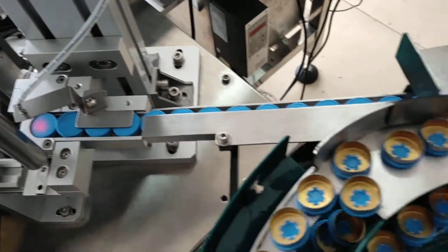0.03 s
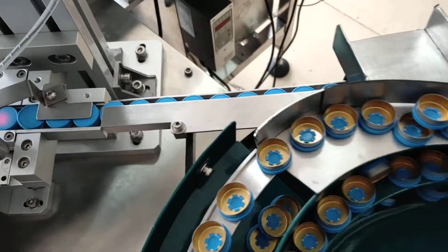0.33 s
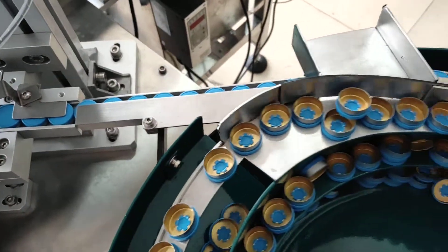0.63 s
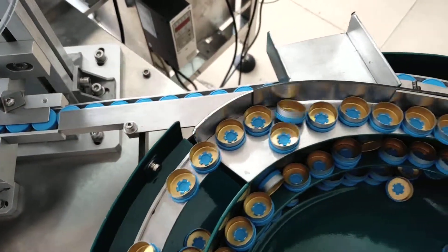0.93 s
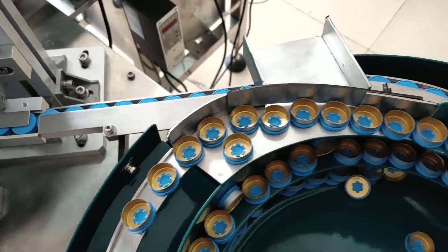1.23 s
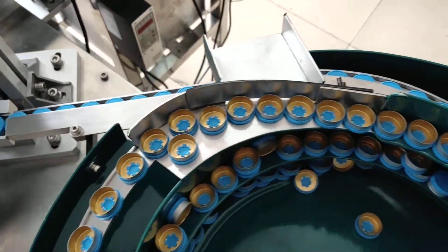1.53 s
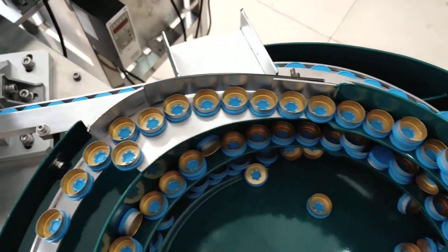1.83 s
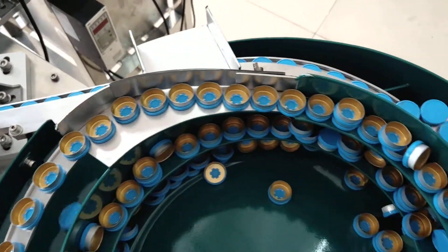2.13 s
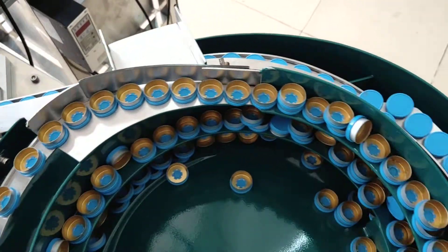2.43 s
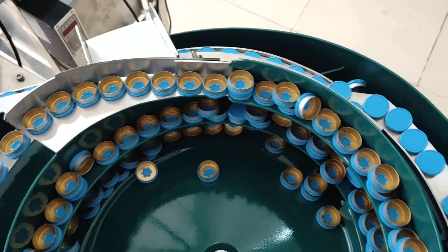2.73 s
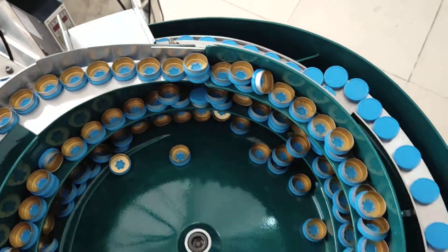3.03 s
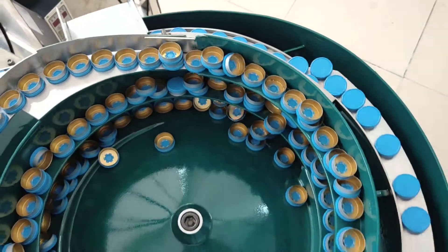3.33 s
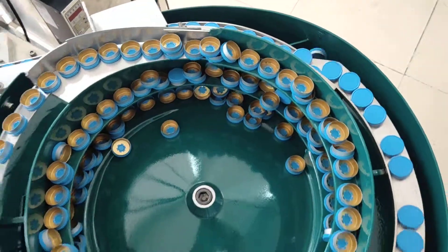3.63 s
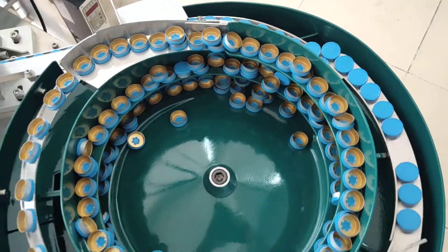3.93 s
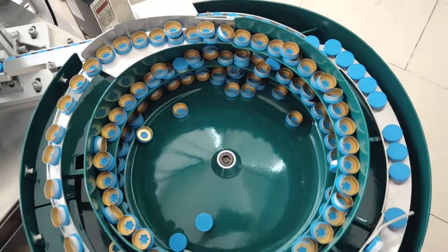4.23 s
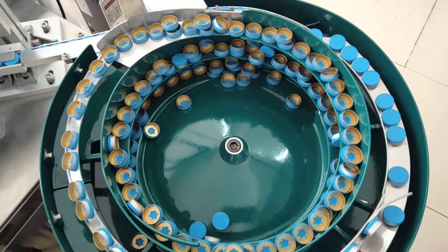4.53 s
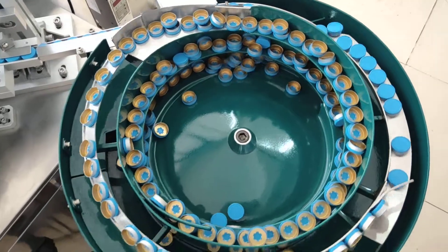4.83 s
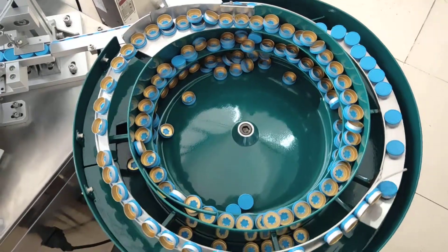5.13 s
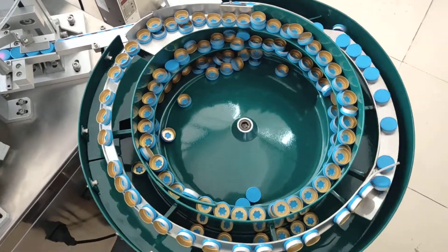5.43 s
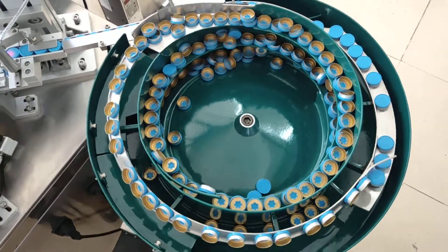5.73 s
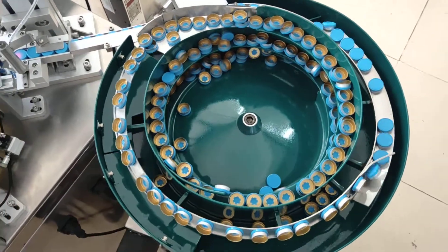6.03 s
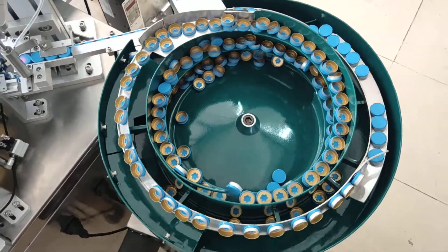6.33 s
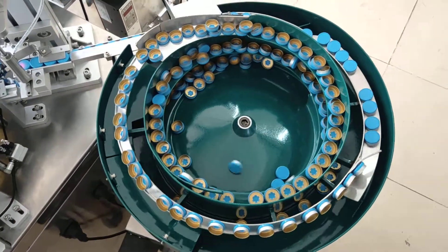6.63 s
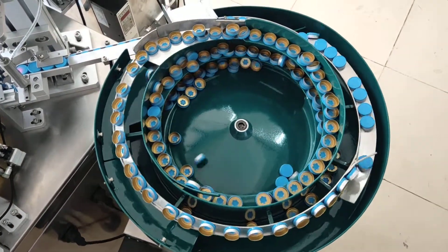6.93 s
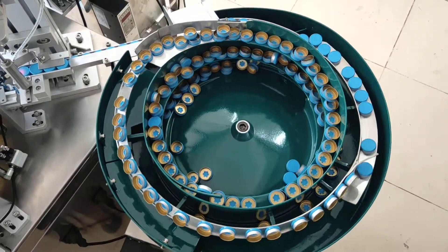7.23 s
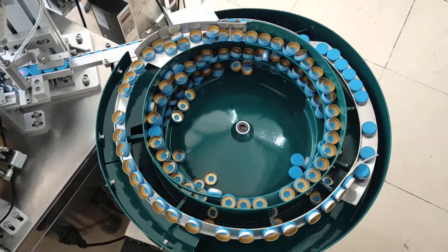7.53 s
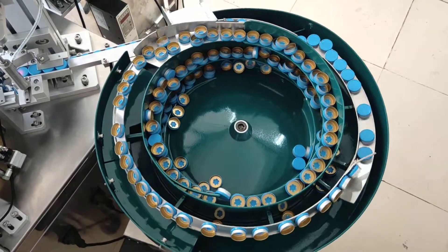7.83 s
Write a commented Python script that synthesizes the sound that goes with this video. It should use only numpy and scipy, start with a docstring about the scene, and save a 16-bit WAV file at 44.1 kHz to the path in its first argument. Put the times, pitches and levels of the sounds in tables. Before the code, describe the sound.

Hundreds of small caps rattle in a vibrating steel bowl, with a low hum, a wavering metallic tone and scattered clicks.

```python
"""A vibratory bowl feeder shakes hundreds of small caps up its spiral track in a factory hall.
From the start the drive magnet hums over the hall's rumble; once a cycle the bowl tosses the caps, whose
impacts merge into a buzzing rattle and excite the steel's resonances. A panel sings in spurts, and now and
then a tumbling cap clicks. After three seconds the microphone, at first near the rim, draws back faster.
From six seconds on, a few caps drop onto the ringing bowl floor or clatter on the heap."""
import sys
import numpy as np
from scipy import signal
from scipy.fft import rfft, irfft, next_fast_len
from scipy.io import wavfile

SR = 44100
rng = np.random.default_rng(int(sys.argv[2]) if len(sys.argv) > 2 else 0)


def output_pcm(signal):
    """Save a mono or channel-first signal as 16-bit PCM at the path in sys.argv[1].

    Samples are clipped to [-1, 1] before scaling.
    """
    pcm = np.clip(np.atleast_2d(signal).T, -1, 1) * 32767
    wavfile.write(sys.argv[1], SR, np.round(pcm).astype(np.int16))


N = 352359
TIME = np.arange(N) / SR
DRIVE_HZ = 95.99


def amp(db):
    """The decibel law: amplitude grows tenfold every 20 dB."""
    return 10 ** (np.asarray(db) / 20)


def unit(x):
    """Normalisation to rms 1."""
    return x / np.sqrt(np.mean(x ** 2) + 1e-20)


def follow(points):
    """Linear interpolation of (time [s], value) points at every sample."""
    return np.interp(TIME, *np.transpose(points))


def wander(rate_hz, size=800):
    """Random modulation: noise of rms about 1, low-passed near rate_hz."""
    f = np.fft.rfftfreq(size, N / SR / size)
    slow = irfft(rfft(rng.standard_normal(size)) * np.exp(-(f / rate_hz) ** 2))
    return np.interp(TIME, np.linspace(0, N / SR, size), unit(slow))


def colour(x, points):
    """Minimum-phase filtering by a (frequency [Hz], gain [dB]) curve."""
    hz, db = np.transpose(points)
    f = abs(np.fft.fftfreq(4096, 1 / SR))
    log_gain = np.log(amp(np.interp(np.log(f + 1), np.log(hz), db)))
    response = np.exp(np.conj(signal.hilbert(log_gain)))
    taps = np.fft.ifft(response).real[:len(f) // 2]
    return signal.oaconvolve(np.atleast_2d(x), taps[None], axes=1)[:, :N]


def add(mix, s, sound):
    """Superposition: a sound joins the mix at s seconds."""
    part = mix[:, round(s * SR):][:, :sound.shape[1]]
    part += sound[:, :part.shape[1]]


def heard(db, exponent, pass_s=0, pass_half_s=1, swell_db=0):
    """Spreading loss: gain goes as 1 / distance ** exponent, and swells as the microphone passes by."""
    # the microphone's path away from the rim: (time [s], distance [m])
    path = [(0, 0.27), (3.05, 0.38), (4.5, 0.7), (6.6, 1.18), (8, 1.1)]
    farther = follow(path) / path[0][1]
    swell = swell_db * np.exp(-((TIME - pass_s) / pass_half_s) ** 2)
    return amp(db + swell) / farther ** exponent


def tone(hz, waver):
    """Multipath interference: reflections make a tone waver differently at each microphone port."""
    paths = np.array([1 + waver * (wander(10) + 1j * wander(5)) for _ in range(2)])
    turns = hz * TIME + rng.random()
    return unit((paths * np.exp(2j * np.pi * turns)).real)


def drive():
    """Forced vibration: the magnet hums, and the steel responds at harmonics of the drive."""
    # the fourth harmonic comes and goes: (time [s], level [dB])
    fourth_level = [(0, -45), (.2, -38), (1.2, -47), (1.5, -37), (1.75, -51), (1.97, -38.5), (2.7, -43),
                    (3.3, -45.5), (3.56, -39.5), (4.05, -48.5), (4.35, -43), (5, -50), (5.5, -41.5),
                    (6, -51.5), (6.6, -42.5), (6.8, -49.5), (7, -43.5), (7.7, -44), (8, -46)]
    # weak overtones: (multiple of the drive, level at the rim [dB], distance exponent)
    overtones = [(2, -49, 0.027), (9, -52, 0.25), (11, -52, 0.34), (16, -48, 0.27), (18, -55, 0.23),
                 (19, -59, .35), (31, -49, 0.8), (33, -55, .1), (35, -50, 0.45), (74, -47, 0.0)]
    # panels that sing along: (multiple of the drive, base level [dB], distance exponent,
    # passing time [s], passing half-width [s], swell [dB])
    panel_tones = [(7, -56.5, 0.4, 0.37, 1.7, 8), (13, -59.5, 0.39, 6.4, 4.4, 19.5),
                   (14, -52, .0, 2.8, 1.9, 7.5), (34, -46, 0.93, 2.6, 0.34, 8.5)]
    hum = unit(np.cos(2 * np.pi * DRIVE_HZ * TIME)) * heard(-15.5, exponent=0.93)
    fourth = tone(4 * DRIVE_HZ, waver=0.16) * amp(follow(fourth_level))
    buzz = sum(heard(*level) * tone(k * DRIVE_HZ, waver=0.4) for k, *level in overtones)
    panels = sum(heard(*level) * tone(k * DRIVE_HZ, waver=0.19) for k, *level in panel_tones)
    return hum + fourth + buzz + panels


def hall():
    """Background noise: factory rumble, faint machine tones and a whine that stands out for a while."""
    # the whine's envelope: (time [s], level [dB])
    whine_level = [(0, -57), (2.1, -51), (2.28, -47), (3.4, -47), (5.1, -49.5), (5.35, -58), (8, -66)]
    # tones of other machines: (frequency [Hz], level [dB])
    machine_tones = [(140, -57), (183, -70), (265, -60), (296, -59), (450, -62.5), (796, -61)]
    # the rumble's spectrum: (frequency [Hz], relative level [dB])
    rumble_spectrum = [(20, -11), (55, -6.5), (100, 0.5), (140, -2), (220, -5), (300, -7), (450, -5),
                       (600, -13.5), (780, -12.5), (1200, -5), (4000, -26), (16000, -36)]
    whine = tone(523.7, waver=0.52) * amp(follow(whine_level))
    machines = sum(amp(db) * unit(np.sin(2 * np.pi * (hz * TIME + rng.random())))
                   for hz, db in machine_tones)
    rumble = amp(-36.5) * unit(colour(rng.standard_normal((2, N)), rumble_spectrum))
    return whine + machines + rumble


def knocks(ring_s, count, size=520):
    """Impulse responses of contacts: dense, damped modes act as decaying noise, of energy 1 per port."""
    bursts = rng.standard_normal((2, count, size)) * np.exp(-np.arange(size) / SR / ring_s)
    return bursts / np.linalg.norm(bursts, axis=2, keepdims=True)


def landings(phase, spread, creep, jitter_s, uneven_db, restless_db, ring_s, count):
    """Phase-locked impacts: each cap lands once a cycle at its own phase, strictly or loosely in time."""
    cycles = np.arange(int(N / SR * DRIVE_HZ) + 1)
    starts = (cycles / DRIVE_HZ * SR).astype(int)
    rattle = np.zeros((2, N))
    places = rng.permutation(np.linspace(-1, 1, count))
    for place, looseness in zip(places, np.geomspace(.02, 1, count)):
        slip, force = rng.standard_normal((2, len(cycles)))
        stroke = phase + spread * place + creep * wander(1.2)[starts]  # in cycles
        landing_s = (cycles + stroke) / DRIVE_HZ + jitter_s * looseness * slip
        hop_db = uneven_db * np.sqrt(looseness) * np.minimum(force, 1.5)
        strengths = unit(amp(hop_db + restless_db * np.minimum(wander(33)[starts], 1.5)))
        # a cap's ring changes as it turns and travels, the faster the looser it sits
        poses = 10 + int(40 * looseness)
        pose = np.linspace(0, poses - 1, len(cycles))[:, None]
        blend = np.sqrt(np.maximum(1 - abs(pose - np.arange(poses)), 0))
        hits = (strengths[:, None] * blend) @ knocks(ring_s, count=poses)
        at = np.maximum(landing_s * SR, 0).astype(int)[:, None] + np.arange(hits.shape[2])
        rattle += [np.bincount(at.ravel(), port.ravel(), N)[:N] for port in hits]
    return rattle


def echoes(x, wet_db, t60):
    """Diffuse reflection from bowl wall and hall, along paths that shift as caps and microphone move."""
    t = np.arange(SR // 3) / SR
    shares = np.array([wander(4.43) for _ in range(3)])
    shares /= np.linalg.norm(shares, axis=0)
    wet = 0
    for share in shares:
        tail = rng.standard_normal((2, len(t))) * 1000 ** (-t / t60) * (t > .002)
        tail /= np.linalg.norm(tail, axis=1, keepdims=True)
        wet += signal.oaconvolve(x * share, tail, axes=1)[:, :N]
    return x + amp(wet_db) * wet


def caps():
    """Impact noise: the heap patters and sizzles; the jostling row on the steel track knocks and ticks."""
    # spectra of the impacts: (frequency [Hz], relative level [dB])
    patter_spectrum = [(250, -33), (450, -13.5), (560, -13.5), (660, -9), (780, -7), (1050, -16),
                       (1300, -3.5), (1450, -6.5), (1900, -3), (2400, -0.5), (2900, -1), (3300, -3.5),
                       (3900, -14.5), (6000, -27), (16000, -54.5)]
    sizzle_spectrum = [(1000, -49), (3000, -16), (3950, -13), (4800, -5.5), (5400, -1.8), (8600, -5.5),
                       (11500, -12), (13300, -11.5), (14600, -10), (16000, -13.5)]
    row_spectrum = [(500, -37.5), (2500, -12.5), (4000, -34), (5500, -0.5), (6400, 4), (7200, 8.5),
                    (7700, 5), (8300, 0.5), (10000, -24), (16000, -17)]
    rail_spectrum = [(500, -32), (2500, 3), (4000, -35), (5500, -5), (6500, -9), (7150, 5), (7600, 15),
                     (8300, 9), (10000, -18), (16000, -11)]
    # envelopes of the low patter and the ticking row: (time [s], level [dB])
    patter_level = [(0, -27.5), (2.8, -27.5), (3.5, -29), (4.2, -30.5), (4.9, -32.5), (8, -34.5)]
    row_level = [(0, -28), (.8, -27), (1.55, -25.5), (2.2, -26), (3.05, -25.5), (4, -28), (5, -30),
                 (8, -31)]
    # the row drifts rightwards: (time [s], left minus right [dB])
    row_lean = [(2.5, 0.5), (5, -4)]
    heap = landings(phase=.4, spread=.2, creep=.015, jitter_s=.003,
                    uneven_db=6.5, restless_db=5.5, ring_s=.0018, count=22)
    row = landings(phase=.33, spread=.11, creep=.006, jitter_s=.0007,
                   uneven_db=8, restless_db=.7, ring_s=.0023, count=10)
    # a few caps, probably in the outlet rail, land earlier in the stroke
    rail = landings(phase=.06, spread=.02, creep=.00049, jitter_s=.00012,
                    uneven_db=-2, restless_db=3, ring_s=.00099, count=3)
    heap = unit(echoes(heap, wet_db=5, t60=0.067))
    row = unit(echoes(row, wet_db=-5, t60=0.2))
    patter = unit(colour(heap + amp(-4) * row, patter_spectrum)) * amp(follow(patter_level))
    sizzle = unit(colour(heap, sizzle_spectrum)) * heard(-24, exponent=0.57)
    jostle_db = wander(21)
    lean_db = np.outer([1, -1], follow(row_lean)) / 2
    row_ticks = unit(colour(row, row_spectrum)) * amp(follow(row_level) + jostle_db + lean_db)
    rail_gain = heard(-53, exponent=0.5, pass_s=8.5, pass_half_s=9, swell_db=21.5)
    rail_ticks = unit(colour(rail, rail_spectrum)) * rail_gain
    return patter + sizzle + row_ticks + rail_ticks


def ring(hz, width_hz):
    """Resonance under random excitation: a band of noise around hz, rms 1."""
    size = next_fast_len(N)
    f = np.fft.rfftfreq(size, 1 / SR)
    excitation = rfft(rng.standard_normal((2, size)))
    response = 1 / (1 + 2j * (f - hz) / width_hz) ** 2
    return unit(irfft(excitation * response, size)[:, :N])


def bowl():
    """Broadband excitation: the patter of caps keeps a few resonances of bowl and stand ringing."""
    # resonances: (frequency [Hz], width [Hz], base level [dB], distance exponent,
    # passing time [s], passing half-width [s], swell [dB])
    resonances = [(379.4, 25, -42.5, 0.89, 3.2, 1.4, 3), (872, 30, -57.5, 0.28, .25, 0.77, 16.5),
                  (896.6, 53, -46.5, 0.073, 3.46, 1.5, 9), (2266, 190, -40, 0.31, 2.2, 1.9, 2.5),
                  (3215, 500, -42.5, 1, 2.1, 1.5, 6)]
    return sum(ring(hz, width) * heard(*level) for hz, width, *level in resonances)


def singing_panel():
    """Forcing near resonance: the loudest panel flutters on the 17th harmonic, over its own broad ring."""
    # spurts, probably as caps press on the panel, and one later sag: (start [s], end [s], gain [dB])
    surges = [(.07, 1.87, 2), (.18, .38, 4.5), (.46, .56, 5), (.69, .85, 8.5), (.85, 1.02, 6.5),
              (1.02, 1.47, 4.5), (1.68, 1.86, 6), (2.5, 4.15, 3.5), (5.3, 5.98, -4)]
    ramp_s = 0.027
    surge_db = sum(db * np.clip(np.minimum(TIME - start, end - TIME) / ramp_s + .5, 0, 1)
                   for start, end, db in surges)
    song = tone(17 * DRIVE_HZ, waver=0.058) * heard(-40.5, exponent=0.68)
    flutter_db = 2.1 * wander(54)
    body = ring(1608, width_hz=100) * heard(-39, exponent=0.27)
    return song * amp(surge_db + flutter_db) + body * amp(0.23 * surge_db)


def blow(spectrum, ring_s):
    """A single impact: a damped burst shaped by the body's spectrum, peak 1."""
    hit = colour(knocks(ring_s, count=1, size=1500)[:, 0], spectrum)
    return hit / abs(hit).max(axis=1, keepdims=True)


def tumbling_caps():
    """Shell resonance: cap strikes cap with a bright click, each at its own pitch."""
    # collisions: (time [s], relative level [dB], ring frequency [Hz])
    collisions = [(0.167, -13.5, 7200), (0.27, -11.5, 7200), (0.917, -6.5, 7440), (1.398, -9.5, 6950),
                  (1.6216, -8.5, 6960), (1.637, -10.5, 6950), (2.0138, -11, 7140), (2.4513, -12, 7030),
                  (2.8496, -8, 6910), (3.7427, -10, 7100), (3.756, -10, 7100), (4.0851, -9, 7000),
                  (4.16, -5.5, 7400), (4.1938, -9, 7180), (4.2602, -5.5, 7260), (4.6195, -7, 7470),
                  (5.0225, -8, 7490), (5.5128, -6, 7560), (6.201, -8, 7290), (6.623, -10.5, 7300),
                  (6.638, -13, 7400), (7.0859, -14.5, 7050), (7.5915, -15, 7150)]
    # spectrum of a cap that rings at shell_hz: (frequency [Hz], relative level [dB])
    shell_spectrum = [(500, -37), (2500, -24), (4000, -22), (5500, 1.5), (6500, -0.5), (7400, 14.5),
                      (8400, -13), (10000, -10), (16000, -25)]
    shell_hz = 7310
    clicks = np.zeros((2, N))
    for s, db, hz in collisions:
        shifted = [(f * hz / shell_hz, gain) for f, gain in shell_spectrum]
        add(clicks, s, amp(db - 3.4) * blow(shifted, ring_s=0.0021))
    return echoes(clicks, wet_db=-6.5, t60=0.25)


def floor_ring():
    """Free vibration: the modes of the struck bowl floor decay exponentially."""
    # floor modes: (frequency [Hz], level [dB], time to fall by 60 dB [s])
    modes = [(1270, -21, 0.15), (1385, -22, 0.15), (1560, -3.5, 0.16), (1790, -16, .1), (2400, -9, 0.12),
             (2780, -10, .06)]
    t = np.arange(SR // 3) / SR
    return sum(amp(db) * 1000 ** (-t / t60) * np.sin(2 * np.pi * hz * t) for hz, db, t60 in modes)


def falling_caps():
    """Impulsive excitation: a cap knocks on the bowl floor and rings it; on the heap it only clatters."""
    # falls onto the floor and onto the heap: (time [s], relative level [dB])
    floor_falls = [(6.008, -32), (6.118, -33), (6.2, -29.5), (6.405, -22), (6.648, -31.5), (7.028, -31),
                   (7.192, -24)]
    heap_falls = [(6.646, -13), (6.666, -17)]
    # a falling cap's own knock: (frequency [Hz], relative level [dB])
    knock_spectrum = [(400, -24), (1000, -17), (1300, 5), (1900, -4), (3000, -7), (4000, -20), (7000, -9),
                      (14000, -19)]
    falls = np.zeros((2, N))
    for s, db in floor_falls:
        add(falls, s, amp(db) * floor_ring()[None])
        add(falls, s, amp(db + 1) * blow(knock_spectrum, ring_s=0.004))
    for s, db in heap_falls:
        add(falls, s, amp(db) * blow(knock_spectrum, ring_s=0.0071))
    return echoes(falls, wet_db=-12, t60=0.2)


def scene():
    """Superposition of the feeder's sources and its hall."""
    return drive() + hall() + caps() + bowl() + singing_panel() + tumbling_caps() + falling_caps()


def record(dry):
    """Port resonance colours each side of the microphone; soft saturation and a band limit follow."""
    # long waves reach both ports alike: (frequency [Hz], gain of their difference [dB])
    port_difference = [(100, -27), (400, -8.5), (800, -4.5), (1500, 0), (2600, 0)]
    # responses of the two ports: (frequency [Hz], gain [dB])
    left_port = [(60, 2), (1000, 1.5), (2500, 1), (5500, 2), (6300, 4.5), (7100, 7.5), (8200, 4), (9500, 2),
                 (12000, 2), (14000, 5), (15000, 9.5), (15700, 8)]
    right_port = [(60, -2.2), (1000, -1.5), (2500, -.5), (4000, -2), (5500, -2), (6550, -14), (7500, -4.5),
                  (9000, -1.5), (12000, -3), (15000, -4.5), (15500, -16)]
    knee, headroom, edge_hz = 0.6, 0.3, 15760
    left, right = dry
    mid = (left + right) / 2
    side = colour((left - right) / 2, port_difference)
    ports = np.vstack([colour(mid + side, left_port), colour(mid - side, right_port)])
    excess = np.maximum(abs(ports) - knee, 0)
    rounded = np.sign(ports) * (np.minimum(abs(ports), knee) + headroom * np.tanh(excess / headroom))
    lowpass = signal.firwin(1501, edge_hz, window=("kaiser", 9), fs=SR)
    return signal.oaconvolve(rounded, lowpass[None], "same")


dry = scene()
out = record(dry)
output_pcm(out)
```